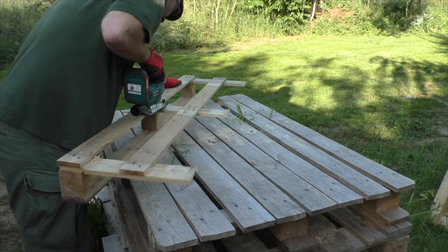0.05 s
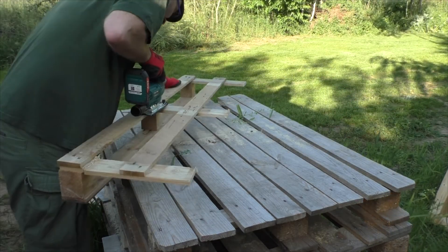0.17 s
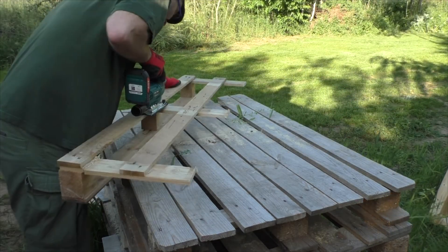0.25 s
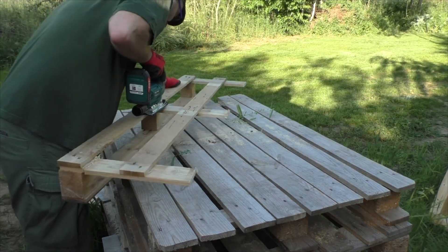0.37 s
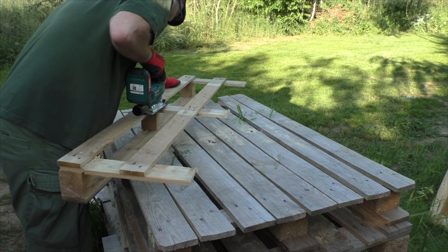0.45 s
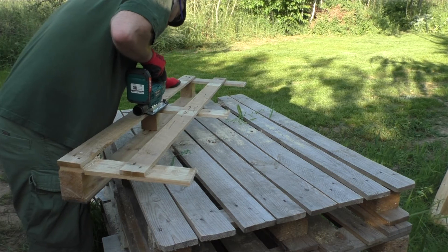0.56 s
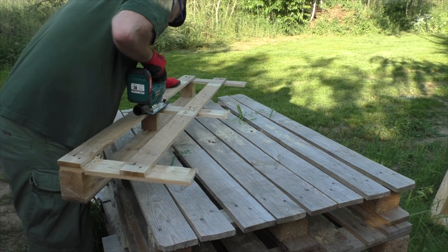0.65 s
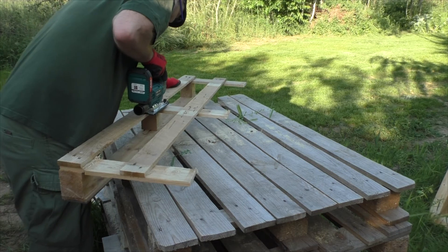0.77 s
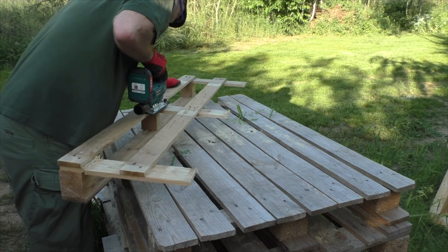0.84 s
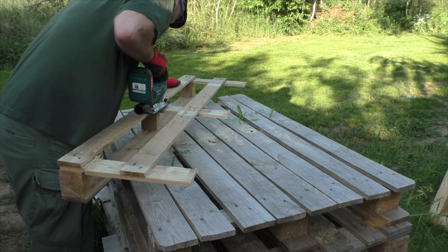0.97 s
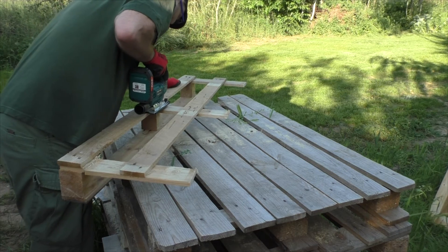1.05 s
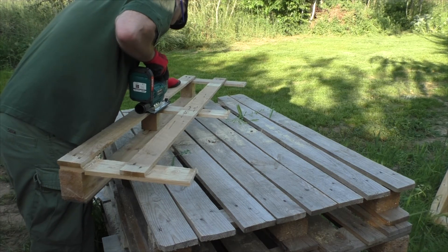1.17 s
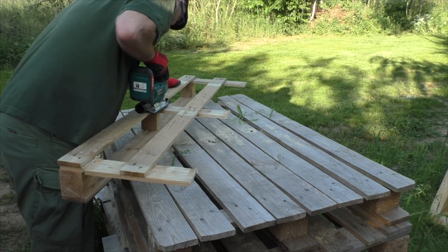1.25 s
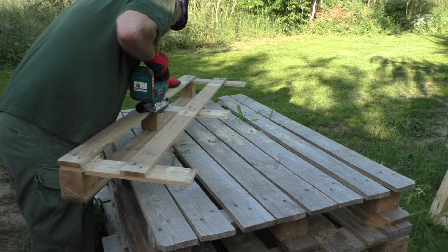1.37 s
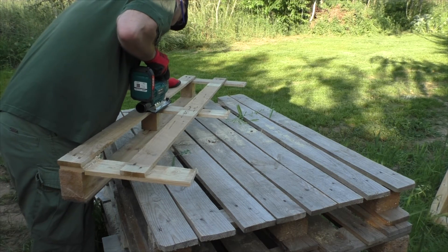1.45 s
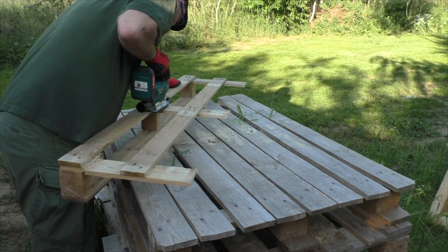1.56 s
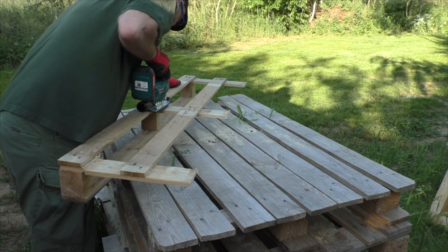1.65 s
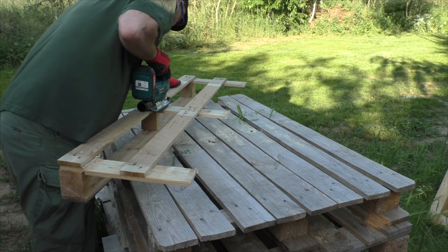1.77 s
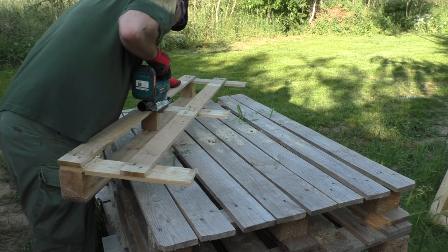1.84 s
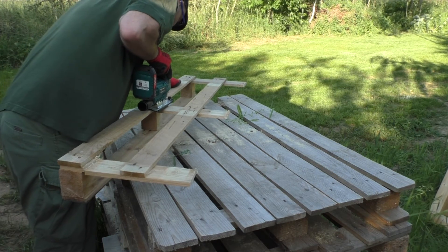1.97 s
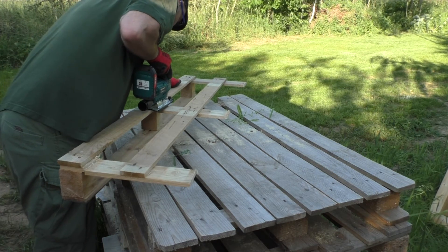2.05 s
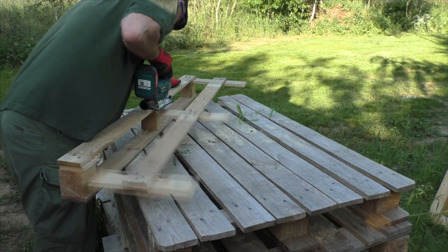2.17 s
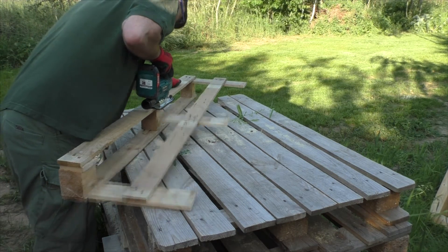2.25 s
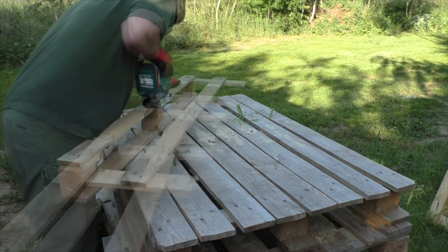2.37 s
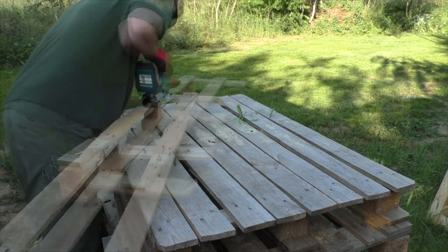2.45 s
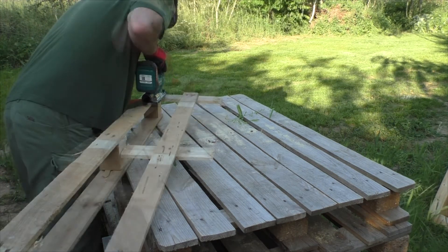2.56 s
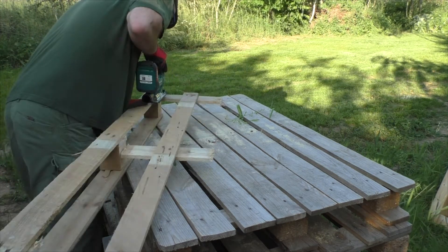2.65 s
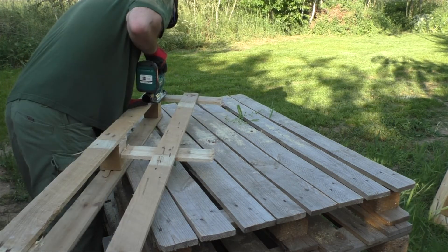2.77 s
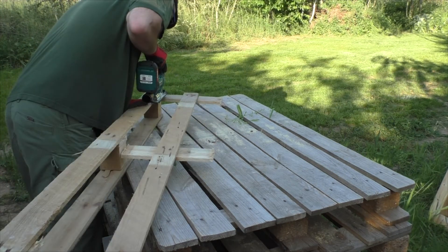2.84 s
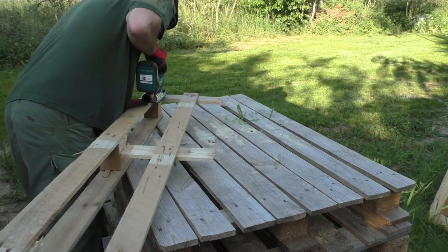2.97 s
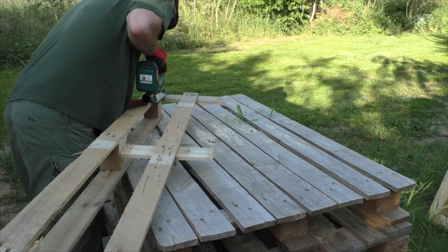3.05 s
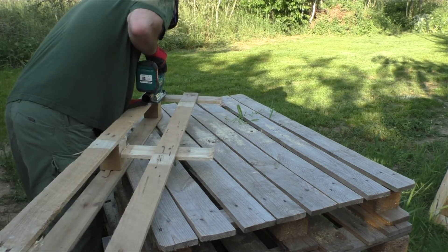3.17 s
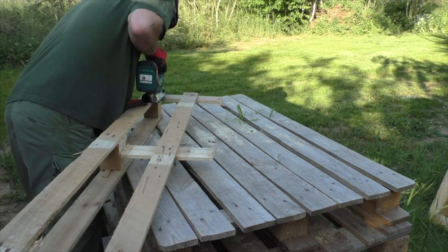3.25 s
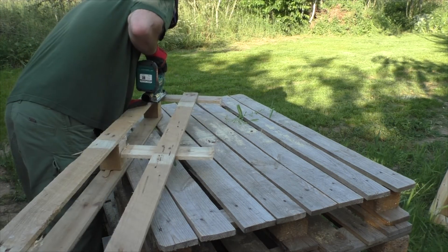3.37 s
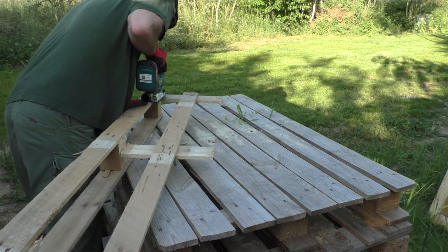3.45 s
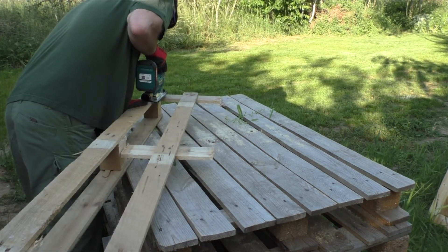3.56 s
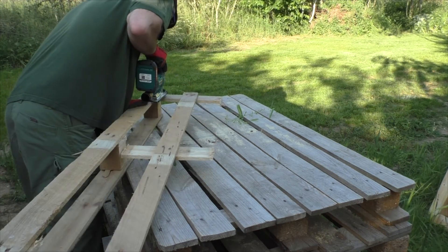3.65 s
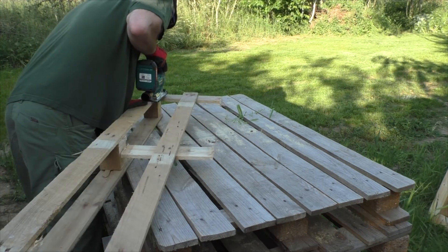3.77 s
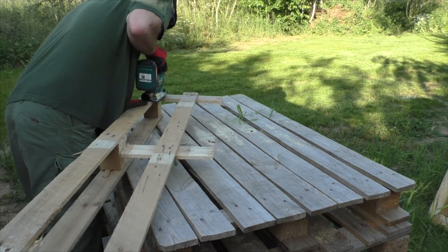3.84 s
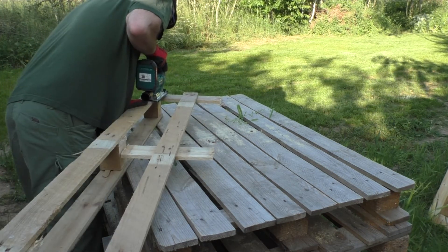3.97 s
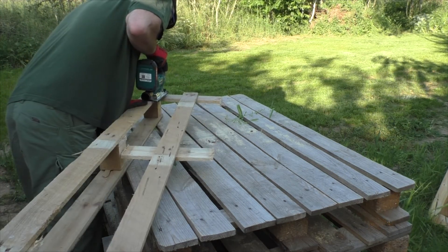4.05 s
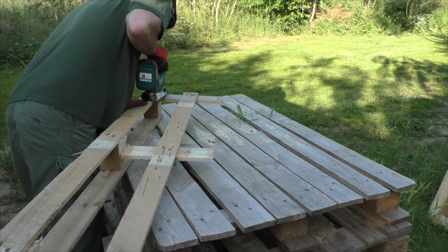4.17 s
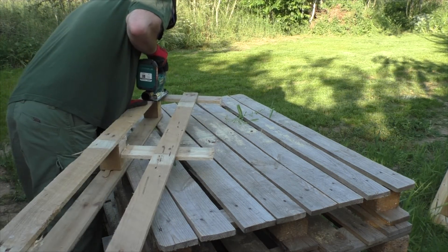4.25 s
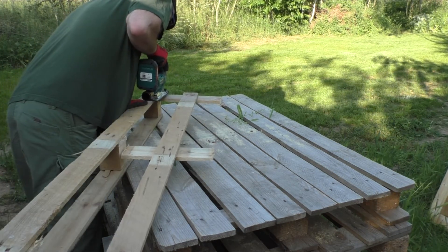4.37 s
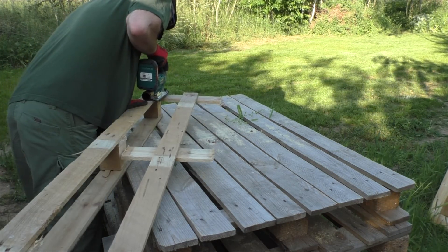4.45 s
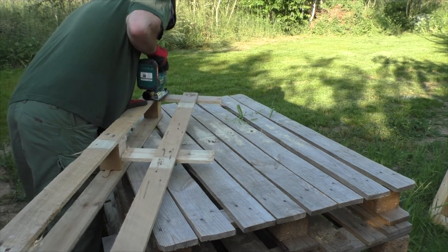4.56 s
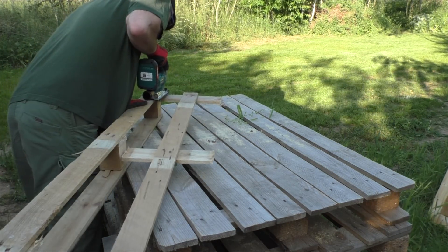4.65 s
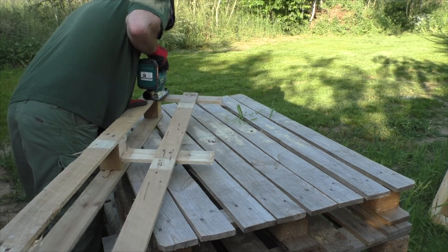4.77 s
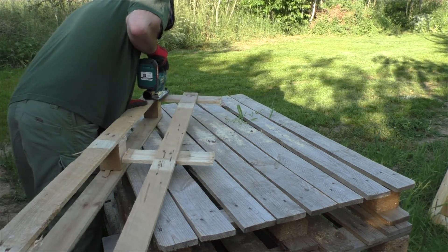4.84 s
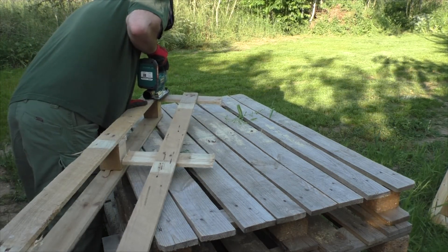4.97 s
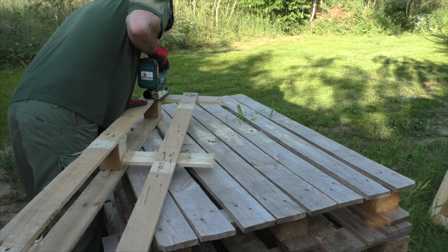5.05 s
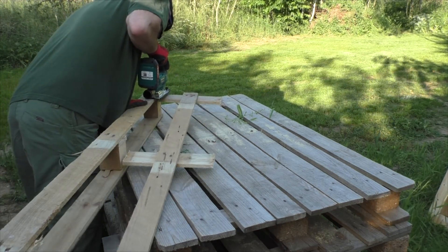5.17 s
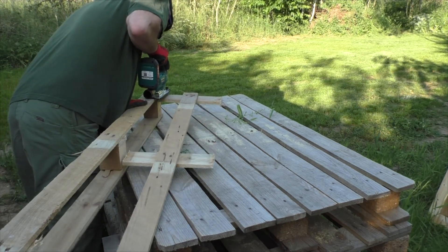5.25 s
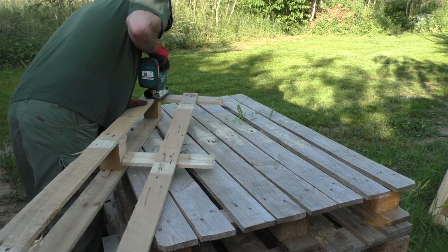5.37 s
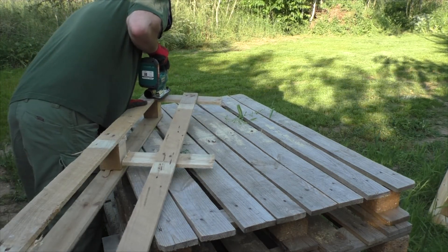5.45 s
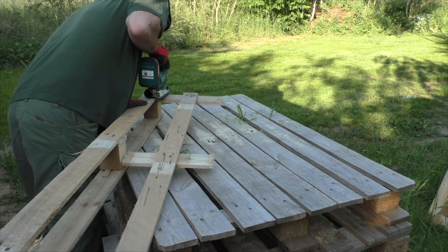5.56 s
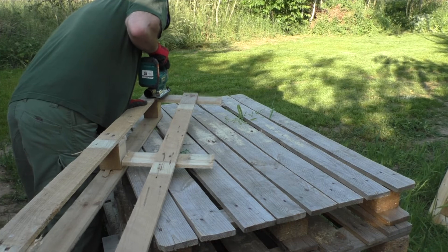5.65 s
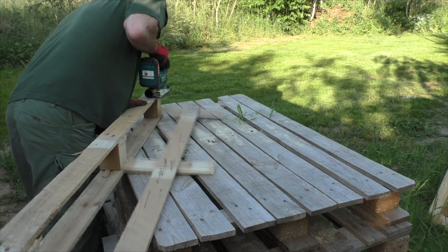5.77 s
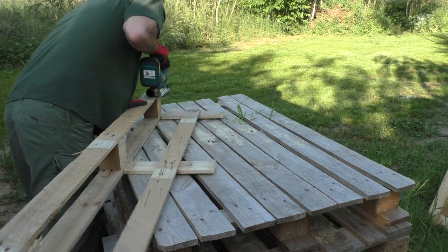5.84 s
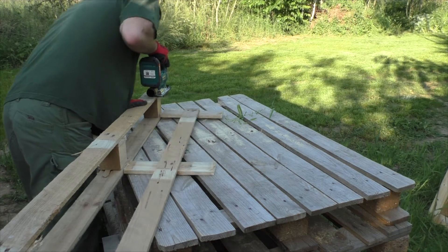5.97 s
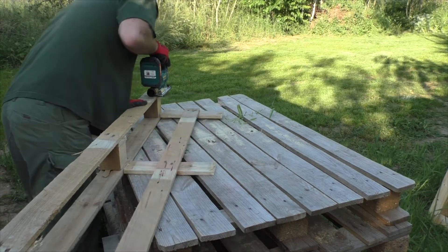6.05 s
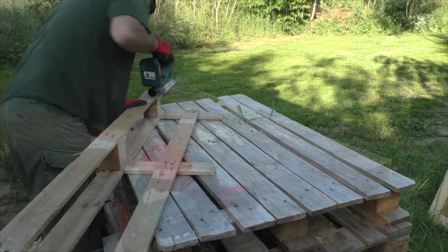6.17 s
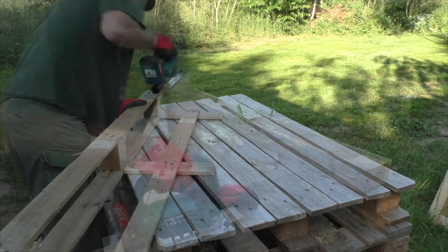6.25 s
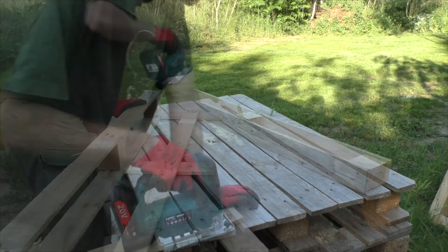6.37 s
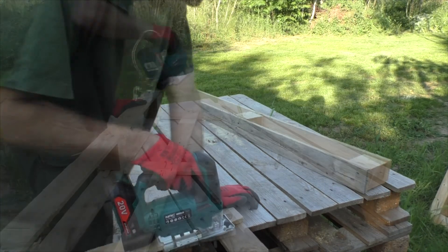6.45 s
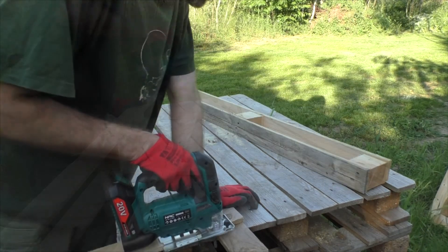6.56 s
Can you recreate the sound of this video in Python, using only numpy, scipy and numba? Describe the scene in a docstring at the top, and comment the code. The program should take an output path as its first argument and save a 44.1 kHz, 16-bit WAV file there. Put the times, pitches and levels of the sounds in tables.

```python
"""On a lawn, a couple of metres from the microphone, a cordless jigsaw makes two cuts through pallet boards.
Noise shaped by each upstroke tears wood and rings the board; the blade clicks, the motor whines in the wood
as a stack of overtones, and jolts repeated on every stroke make the pallet drone. The shoe slaps in short bursts,
mostly as a cut starts, with sharp metallic clicks; then the blade runs free, the motor slows and fades quickly
once the trigger is let go, and loose wood knocks and slides."""
import sys
import numpy as np
from scipy import signal
from scipy.fft import rfft, irfft
from scipy.io import wavfile
from scipy.ndimage import uniform_filter1d, map_coordinates
from numba import njit

SR = 44100
rng = np.random.default_rng(int(sys.argv[2]) if len(sys.argv) > 2 else 0)


def int16_out(signal):
    """Quantize to a 16-bit WAV file."""
    q = np.round(np.clip(np.atleast_2d(signal).T, -1, 1) * 32767)
    wavfile.write(sys.argv[1], SR, q.astype(np.int16))


N = 291060

# colour of wood sliding and of the dry crack in a knock: (frequency [Hz], level [dB])
SLIDE_COLOUR = [(88, -34), (150, -3.5), (196, -14), (378, -9), (601, -6.5), (1510, -9.5), (2270, -6.5),
                (4290, -17.5), (7640, -22.5), (15000, -37)]
# working and free-running speed [strokes per second]
WORKING_HZ, FREE_HZ = 38.5, 42.1


def undb(db):
    """Decibels to gain."""
    return 10 ** (np.asarray(db) / 20)


def unit(x):
    """Scale to rms 1."""
    return x / np.sqrt(np.mean(x ** 2))


def steady(x, span_s=0.105):
    """Hold the short-time rms at 1; the default span leaves the single strokes alone."""
    power = uniform_filter1d(x ** 2, int(span_s * SR))
    return x / np.sqrt(np.maximum(power, 1e-12))


def ramp(start_s, end_s):
    """A straight rise from 0 to 1 between two moments."""
    return np.clip((np.arange(N) / SR - start_s) / (end_s - start_s), 0, 1)


def swell(s, spread_s):
    """A smooth rise to 1 and fall around one moment."""
    return np.exp(-((np.arange(N) / SR - s) / spread_s) ** 2)


def burst(s, length_s):
    """A sudden contact that dies away."""
    age = np.arange(int(.2 * SR)) / SR
    start = int(s * SR)
    gate = np.zeros(N + len(age))
    gate[start:start + len(age)] = np.exp(-age / length_s) * (1 - np.exp(-age / 0.00072))
    return gate[:N]


def tick(phase, at, length):
    """A short decaying gate at one place in the stroke; place and length are shares of the cycle."""
    return np.exp(-((phase - at) % 1) / length)


def colour(x, points, size=8192):
    """Causal minimum-phase filter through (Hz, dB) points, falling away outside them."""
    hz, db = np.transpose(points)
    octave = np.log2(np.maximum(np.arange(size // 2 + 1) * SR / size, 1))
    knots = np.log2(hz)
    outside = abs(octave - np.clip(octave, knots[0], knots[-1]))
    db = np.interp(octave, knots, db) - 24 * np.minimum(outside, 2)  # 24 dB per octave, for two octaves
    # folding the cepstrum forward in time makes the filter causal
    cepstrum = irfft(np.log(undb(db)))
    cepstrum[1:size // 2] *= 2
    cepstrum[size // 2 + 1:] = 0
    return signal.fftconvolve(x, irfft(np.exp(rfft(cepstrum))))[:N]


@njit
def svf(x, hz, width):
    """Band-pass resonance with a moving centre, gain 1 there."""
    y, band, low = np.empty(len(x)), 0., 0.
    for i in range(len(x)):
        g, k = np.tan(np.pi * hz[i] / SR), width / hz[i]
        v = (band + g * (x[i] - low)) / (1 + g * (g + k))
        band, low, y[i] = 2 * v - band, low + 2 * g * v, k * v
    return y


def grit(size=40):
    """Noise in millisecond grains of uneven strength."""
    strength = undb(2.6 * rng.standard_normal(N // size + 1))
    return unit(rng.standard_normal(N) * np.repeat(strength, size)[:N])


def flutter(hz):
    """Smooth chance up to the given rate, rms 1."""
    return unit(signal.sosfilt(signal.butter(2, hz, fs=SR, output="sos"), rng.standard_normal(N)))


def stroke_phase(speed):
    """Strokes counted since the trigger was pulled; whole numbers fall in the middle of the upstroke."""
    return np.cumsum(speed) / SR


def per_stroke(phase, count=400):
    """One random value for each stroke, changing near the bottom turn."""
    return rng.standard_normal(count)[(phase + .23).astype(int)]


def repeating(phase, likeness, size=1200, count=260):
    """Roughness met by the same teeth on each stroke, changing from one to the next as likeness allows."""
    keep = np.clip(likeness, 0, .995)
    fresh = rng.standard_normal((count, size))
    rows = signal.lfilter([np.sqrt(1 - keep ** 2)], [1, -keep], fresh, axis=0)
    return map_coordinates(rows.ravel(), [(phase + 20) * size], order=1)


def first_cut():
    """The first board: sawing, shoe slaps and the running motor share one stroke speed."""
    # motor speed: (time [s], rate [strokes per second])
    loaded = [(0.1, 14.26), (0.28, 43.99), (0.36, 43.68), (0.44, 32.36), (0.55, 37.65), (0.95, 38.52),
              (1.45, 36.74), (1.8, 36.57), (2.2, 35.26)]
    # (motor rattles [s], blade bites [s], shoe pressed flat [s], blade breaks through [s], trigger let go [s])
    course = (.105, .114, .36, 2.27, 2.43)
    # the board swells where the blade drives it, the blade's own rings likewise:
    # (strongest at [s], spread [s], frequency [Hz], glide [Hz], width [Hz], level [dB])
    rings = [(.4, 0.18, 296, 10, 70, 5.5), (.45, 0.83, 1030, -50, 130, 5), (.8, 0.28, 2010, 88, 170, 1.5),
             (.95, 0.25, 2460, 0, 55, 3), (1.62, 0.33, 1460, -47, 169, 6), (2.1, 0.54, 2200, 15, 170, -0.5)]
    blade = [(.36, 0.23, 8250, 0, 700, 1), (1.05, 0.13, 13200, -200, 700, 1), (2., 0.26, 2970, 0, 600, -1)]
    # tearing wood, rasping teeth and shaken pallet: (frequency [Hz], level [dB])
    wood = [(180, -27), (300, -4), (434, -6), (868, -1), (1020, 2.5), (1210, 0.5), (1520, 3), (1830, 3),
            (2280, 2.5), (2860, -4), (4000, -28), (5200, -9), (8800, -120)]
    teeth = [(1800, -66.5), (3000, 1.5), (3800, 3), (5400, -3.5), (7000, -6), (8400, -1), (10400, -20.5),
             (11700, -11), (13000, -10.5), (15800, -28.5)]
    pallet = [(36, -15), (75, -28), (112, -5.5), (150, -7), (185, -2), (222, -3), (265, -4.5), (295, -12.5),
              (335, -1), (410, -8), (560, -5.5), (800, -19.5)]
    # motor whine: one level [dB] for each overtone from 2 to 7
    overtones = [-39, -47.5, -45, -47.5, -52, -61]
    speed = motor_speed(loaded, course)
    saw = cut(speed, course, rings, wood, blade, teeth, pallet, overtones,
              tear_db=-21.0, drone_db=-40.0, rasp_db=-25.5, click_db=-7.0, likeness=0.3)
    saw += slaps(speed, course, wood, rings, teeth, pallet, hop_db=-11, settle_s=0.16, thud_db=-0.5)
    return saw + mechanism(speed, course, rattle_db=-29.0, fade_db_per_s=424)


def second_cut():
    """The second board, sawn more slowly at first, with its own rings and colours."""
    # motor speed: (time [s], rate [strokes per second])
    loaded = [(3.06, 28.38), (3.2, 24.73), (3.55, 31.3), (3.8, 29.17), (4.42, 29.25), (4.55, 35.97),
              (5.3, 36.16), (5.5, 36.44), (5.78, 35.87)]
    # (motor rattles [s], blade bites [s], shoe pressed flat [s], blade breaks through [s], trigger let go [s])
    course = (3.068, 3.07, 3.6, 5.85, 6.018)
    # rings of the board and of the blade:
    # (strongest at [s], spread [s], frequency [Hz], glide [Hz], width [Hz], level [dB])
    rings = [(3.1, 0.71, 1350, 17, 133.5, 15), (3.2, 0.81, 1770, 7, 150, 4), (3.75, 0.43, 437, -4, 45, 5),
             (4.05, 0.15, 265, -2, 35, 15.5), (4.12, 0.44, 1345, -45, 170, 9),
             (4.8, 0.75, 2510, -21, 60.3, 15), (5.25, 0.33, 887, 40, 170, 0),
             (5.35, 0.42, 1790, 135, 260, 4.5), (5.74, 0.28, 2380, 60, 626, 5)]
    blade = [(4.6, 0.13, 7200, 150, 900, 10), (5.15, 0.19, 12700, 0, 1300, 10),
             (5.75, 0.18, 2780, 0, 710, -7)]
    # tearing wood, rasping teeth and shaken pallet: (frequency [Hz], level [dB])
    wood = [(180, -53.5), (300, -4), (505, -6.5), (562, -3), (730, -4), (946, -0.5), (1130, -2.5),
            (1660, 4.5), (1940, -3.5), (2460, -7.5), (4000, -29.5), (5200, -69), (8800, -120)]
    teeth = [(1800, 4), (3000, 11.5), (4000, 7.5), (5400, 1), (6700, -9.5), (7900, 2), (10400, -13.5),
             (12300, -7.5), (13300, -7.5), (15800, -21)]
    pallet = [(30, -25), (58, -4), (88, -24), (110, -3.5), (145, 3), (183, 1.5), (222, 0.5), (263, -3),
              (295, 4), (350, -7.5), (440, -5.5), (580, 2.5), (800, -21.5)]
    # motor whine: one level [dB] for each overtone from 2 to 7
    overtones = [-40.5, -44.5, -57, -63, -53, -58]
    speed = motor_speed(loaded, course)
    saw = cut(speed, course, rings, wood, blade, teeth, pallet, overtones,
              tear_db=-20.0, drone_db=-39, rasp_db=-27.0, click_db=-12.0, likeness=0.34)
    saw += slaps(speed, course, wood, rings, teeth, pallet, hop_db=-13.5, settle_s=0.052, thud_db=-3)
    return saw + mechanism(speed, course, rattle_db=-31.5, fade_db_per_s=253)


def motor_speed(loaded, course):
    """Strokes per second: held back by the wood, free once through it, half as fast after the trigger is let go."""
    recover_s, slow_s = 0.17, .14
    end_s, release_s = loaded[-1][0], course[-1]
    free = [(end_s + recover_s, FREE_HZ), (release_s, FREE_HZ), (release_s + slow_s, FREE_HZ / 2)]
    s, rate = np.transpose(list(loaded) + free)
    t = np.arange(N) / SR
    return np.interp(t, s, rate) * (t >= loaded[0][0])


def cut(speed, course, rings, wood, blade, teeth, pallet, overtones, tear_db, drone_db, rasp_db, click_db, likeness):
    """One cut: the teeth tear upward, the blade clicks just after the top and rubs back down."""
    # force through one stroke, from the middle of the upstroke: (share of the cycle, tearing [dB], rasp [dB])
    stroke = [(0, 5.5, 9.5), (.12, 2.5, 5.5), (.27, -5.5, -4), (.36, 1, 0), (.41, -18, -1), (.5, 4.5, -3.5),
              (.6, -3.5, 6.5), (.77, -0.5, -12.5), (.89, 2, 4)]
    break_s = 0.088  # the teeth let go as the wood thins out
    phase = stroke_phase(speed)
    _, bite_s, _, through_s, _ = course
    in_wood = ramp(bite_s, bite_s + 0.0079) * (1 - ramp(through_s - break_s, through_s))
    tear_level, drone_level, rasp_level = feed(speed, course)
    place, tear_force, rasp_force = np.transpose(stroke)
    tear_gate = undb(np.interp(phase % 1, place, tear_force, period=1) + .5 * per_stroke(phase))
    rasp_gate = undb(np.interp(phase % 1, place, rasp_force, period=1) + .5 * per_stroke(phase))
    tear = steady(board(tear_gate * repeating(phase, likeness), wood, rings))
    rasp = board(rasp_gate * grit(), teeth, blade)
    # the turn of the blade is a brighter, shorter sound than the tearing
    click = tick(phase, at=.37, length=0.12) * undb(2 * per_stroke(phase)) * rng.standard_normal(N)
    click = np.diff(colour(click, teeth), prepend=0)
    rasp = steady(unit(rasp) + undb(click_db) * unit(click))
    drone = steady(colour(shaking(phase), pallet))
    sawing = undb(tear_db) * tear_level * tear
    sawing += undb(drone_db) * drone_level * drone
    sawing += undb(rasp_db) * rasp_level * rasp
    return in_wood * (sawing + whine(speed, overtones, bite_s))


def feed(speed, course):
    """Gains of tearing, drone and rasp: the teeth skim, bite hardest as the shoe lies flat, then break out."""
    skim_tear_db, skim_drone_db, skim_rasp_db = -3, -10, -18.5
    fresh_db, fresh_spread_s = 2.5, 0.53
    # the pallet drones most shortly before the end of a cut, when the offcut hangs loose
    loose_db, loose_before_s, loose_spread_s = 6.5, 0.64, 0.53
    # tearing and rasp dip briefly just before the blade breaks through
    breakout_dip_db, breakout_before_s, breakout_spread_s = -1.5, 0.15, 0.041
    rasp_db_per_hz = 0.32  # for each stroke per second above the working speed
    _, bite_s, flat_s, through_s, _ = course
    skim = 1 - ramp(bite_s, flat_s) ** 10.0
    breakout_db = breakout_dip_db * swell(through_s - breakout_before_s, breakout_spread_s)
    tear_db = skim_tear_db * skim + fresh_db * swell(flat_s, fresh_spread_s) + breakout_db
    drone_db = skim_drone_db * skim + loose_db * swell(through_s - loose_before_s, loose_spread_s)
    rasp_db = skim_rasp_db * skim + rasp_db_per_hz * (speed - WORKING_HZ) + breakout_db
    return undb([tear_db, drone_db, rasp_db])


def board(x, body, rings):
    """The broad colour of a board or blade, and its rings that swell and glide as the cut moves on."""
    x, t = colour(x, body), np.arange(N) / SR
    out = x.copy()
    for s, spread_s, hz, glide_hz, width_hz, db in rings:
        centre_hz = hz + glide_hz * np.tanh((t - s) / spread_s)
        out += undb(db) * swell(s, spread_s) * svf(x, centre_hz, float(width_hz))
    return out


def whine(speed, overtones, bite_s):
    """Overtones of the motor, building up as the blade sinks in and swelling as each upstroke loads it."""
    turns_per_stroke = 55.7  # cycles of the fundamental in one stroke
    start_db, build_s, db_per_hz, flutter_hz = -18, .9, -.6, 58  # louder the more the motor labours
    phase = stroke_phase(speed)
    effort_db = start_db * (1 - ramp(bite_s, bite_s + build_s))
    effort_db += db_per_hz * (np.maximum(speed, FREE_HZ / 2) - WORKING_HZ)
    load = (1.05 + .8 * np.cos(2 * np.pi * phase)) * undb(effort_db)
    angle = 2 * np.pi * turns_per_stroke * (phase + .0013 * np.sin(2 * np.pi * phase))
    tone = np.zeros(N)
    for k, db in enumerate(overtones, 2):
        # random sine and cosine strengths smear each overtone into a narrow band
        smeared = flutter(flutter_hz) * np.sin(k * angle) + flutter(flutter_hz) * np.cos(k * angle)
        tone += undb(db) * smeared
    return load * tone


def shaking(phase, count=22):
    """The plunger jolts the pallet alike on every stroke; loose joints add roughness."""
    jolts = sum(np.sin(2 * np.pi * (k * phase + rng.random())) for k in range(1, count))
    loose = repeating(phase, likeness=0.87) * (1 + 3 * tick(phase, at=0.18, length=0.25))
    return unit(jolts) + undb(-7) * unit(loose)


def slaps(speed, course, wood, rings, teeth, pallet, hop_db, settle_s, thud_db, metal_db=-10):
    """The blade grabs, lifts the saw and drops its shoe on the board, once a stroke until it is pressed flat."""
    # the hardest slaps of the shoe: (time [s], level [dB], decay [s])
    hard_slaps = [(.115, -21, .025), (.144, -13, .016), (.19, -12, .014), (.22, -10, .011),
                  (.341, -11, .005), (2.117, -11, .004), (2.172, -17, .006), (2.201, -14, .007),
                  (3.07, -16, .004), (3.097, -5, .007), (3.108, -4, .011), (3.167, -4, .006),
                  (3.286, -5, .005), (3.396, -5, .005), (3.431, -6, .006), (3.529, -9, .005),
                  (5.78, -15, .015)]
    hop_at, hop_length, hop_scatter_db = .92, 0.12, 3.5  # place and length as shares of the cycle
    phase = stroke_phase(speed)
    _, _, flat_s, through_s, _ = course
    hopping = (phase > hop_at) * (1 - ramp(flat_s - settle_s, flat_s + settle_s))
    hop_strength = undb(hop_db + hop_scatter_db * per_stroke(phase))
    hops = hopping * tick(phase, hop_at, hop_length) * hop_strength
    hardest = sum(undb(db) * burst(s, length_s) for s, db, length_s in hard_slaps if s < through_s)
    hardest = (speed > 0) * hardest  # leaves out slaps from before this cut
    blows = np.maximum(hops, hardest)
    energy = np.maximum(uniform_filter1d(blows ** 2, int(.03 * SR)), 0)
    ring = steady(board(blows * rng.standard_normal(N), wood, rings), span_s=.03)
    thud = colour(hardest * rng.standard_normal(N), pallet)  # only hard slaps shake the whole pallet
    metal = blows * unit(colour(grit(), teeth))
    return np.sqrt(energy) * ring + undb(thud_db) * thud + undb(metal_db) * metal


def mechanism(speed, course, rattle_db, fade_db_per_s, clack=2.0):
    """Plunger and bearings clack twice a stroke over the motor's rush, fading quickly once the trigger is let go."""
    # colour of the housing: (frequency [Hz], level [dB])
    housing = [(88, -42), (150, -5), (445, -6.5), (681, -1), (912, -3.5), (1450, -4), (2700, -11),
               (3980, -3), (4840, -13), (8660, -14), (15500, -32.5)]
    rattle_db_per_hz = 0.4  # for each stroke per second above the working speed
    phase, t = stroke_phase(speed), np.arange(N) / SR
    db = rattle_db + rattle_db_per_hz * np.maximum(speed - WORKING_HZ, 0)
    db = db - fade_db_per_s * np.maximum(t - course[-1], 0)
    gate = 1 + clack * (tick(phase, at=.39, length=0.08) + tick(phase, at=0.94, length=0.025))
    return (t > course[0]) * undb(db) * unit(colour(gate * grit(), housing))


def metal_clicks():
    """Sharp metallic clicks of bright noise, most of them along with hard slaps of the shoe."""
    # (time [s], level [dB])
    clicks = [(.144, -5), (.219, -4), (0.32, -5.5), (2.202, -9), (3.109, -4.5), (5.778, -9), (5.868, -19),
              (6.332, -24)]
    # colour of a click: (frequency [Hz], level [dB])
    click_colour = [(2000, 7), (4000, -4), (8000, 5), (10500, -8), (13000, -3), (15800, -17)]
    contact = sum(undb(db) * burst(s, length_s=0.0018) for s, db in clicks)
    return contact * unit(colour(rng.standard_normal(N), click_colour))


def knocks(size=9000):
    """Loose boards bump the pallet with wooden modes and a dry crack; the first row is the motor's start chirp."""
    # the first row is the motor's short chirp as it starts, the others are loose boards:
    # (time [s], level [dB], main ring [Hz], crack against level [dB], decay [s])
    bumps = [(0.115, -19, 740, -15, 0.014), (2.34, -13, 1260, -40, 0.0077), (2.352, -14, 1330, -30, 0.009),
             (2.654, -27, 1270, -45, 0.0071), (2.713, -25.5, 1820, -3, 0.0033),
             (5.914, -13, 1150, -12.5, 0.013), (6.243, -27, 1084, -36, 0.013),
             (6.334, -42, 1820, 10, 0.0049), (6.401, -26, 2020, -4, 0.0028),
             (6.445, -31, 1100, -15, 0.0091), (6.495, -28.5, 2700, -1, .005)]
    # modes of a loose board: (frequency [multiple of main ring], width [multiple of main ring], level [dB])
    modes = [(.27, 0.028, 5), (.46, 0.14, 7.5), (.69, 0.21, -5), (.8, 0.29, 18), (1, .05, 23),
             (1.3, 0.32, -6), (1.75, .2, -36)]
    out, crack = np.zeros(N), unit(colour(grit(), SLIDE_COLOUR))
    for s, db, hz, crack_db, length_s in bumps:
        contact = undb(db) * burst(s, length_s)
        span = slice(int(s * SR), int(s * SR) + size)
        push = contact[span] * rng.standard_normal(size)[:len(contact[span])]
        ring = np.zeros(len(push))
        for ratio, width, mode_db in modes:
            mode_hz = np.full(len(push), float(ratio * hz))
            ring += undb(mode_db) * svf(push, mode_hz, float(width * hz))
        # wood on wood is a soft contact
        ring = signal.sosfilt(signal.butter(2, 2 * hz, fs=SR, output="sos"), ring)
        out[span] += ring * np.linalg.norm(push) / np.linalg.norm(ring)  # as much energy as the push
        out += undb(crack_db) * contact * crack
    return out


def slide():
    """Wood is pushed over the pallet: gritty noise in smooth swells."""
    # (strongest at [s], spread [s], level [dB])
    pushes = [(6.231, 0.077, -44), (6.36, 0.037, -39), (6.43, 0.024, -36.5), (6.51, 0.056, -46)]
    level = sum(undb(db) * swell(s, spread_s) for s, spread_s, db in pushes)
    return level * unit(colour(grit(), SLIDE_COLOUR))


def surroundings(x, tail_db=-15, t60_s=0.094, count=8000):
    """Short scatter from the pallet stack and the hedge: a decaying, softened noise tail."""
    age = np.arange(count) / SR
    scatter = signal.lfilter([1], [1, -.6], rng.standard_normal(count))
    tail = scatter * 1000 ** (-age / t60_s) * (age > .003)
    return x + undb(tail_db) * signal.fftconvolve(x, tail / np.linalg.norm(tail))[:N]


def garden():
    """The quiet garden behind the saw: steady noise, mostly low."""
    # (frequency [Hz], level [dB])
    hush = [(12, -38), (20, 8.5), (41, -28), (56, -7), (72, -4.5), (139, -15.5), (445, -14.5), (1420, -19),
            (3010, -25), (3860, -27), (5690, -29.5), (8620, -33.5), (15000, -55)]
    return undb(-48) * unit(colour(rng.standard_normal(N), hush))


def scene():
    """Two cuts and the handling of the wood, scattered by the surroundings, over the quiet garden."""
    close = first_cut() + second_cut() + metal_clicks() + knocks() + slide()
    return (surroundings(close) + garden())[None]


def record(dry):
    """The microphone's recorder rounds the highest peaks and cuts the top."""
    top_hz = 15900
    rounded = 1.15 * np.tanh(dry / 1.15)
    return signal.sosfilt(signal.ellip(10, .2, 80, top_hz, fs=SR, output="sos"), rounded)


dry = scene()
out = record(dry)
int16_out(out)
```